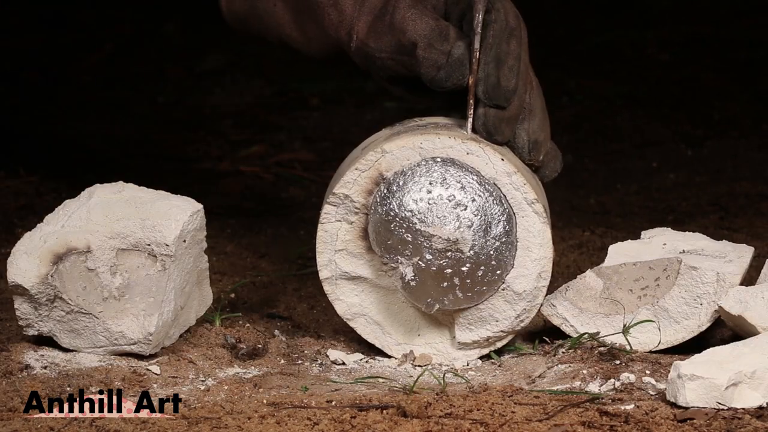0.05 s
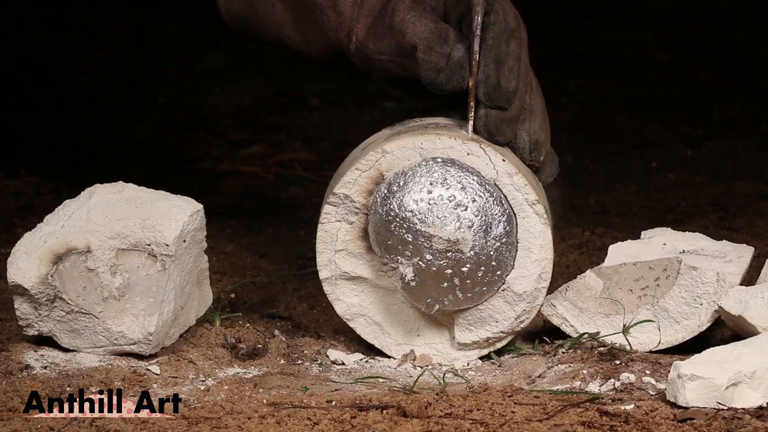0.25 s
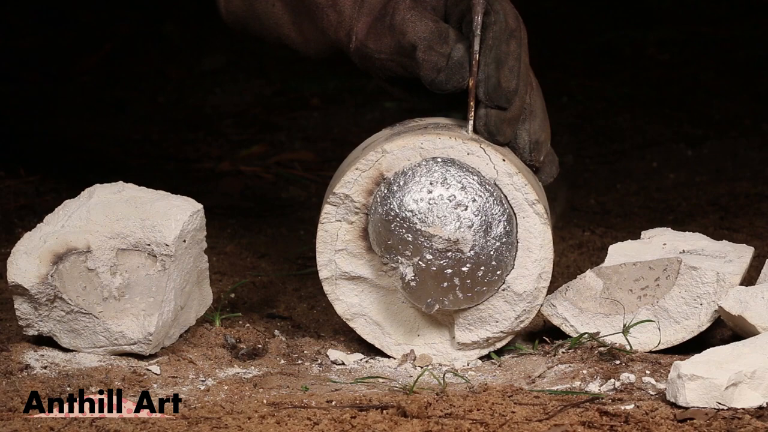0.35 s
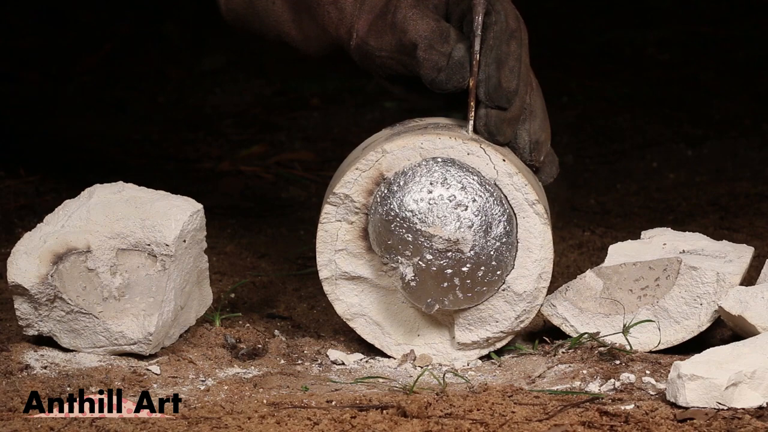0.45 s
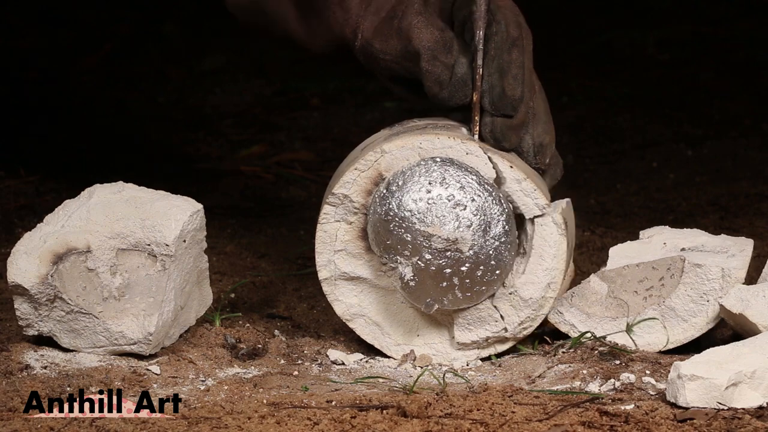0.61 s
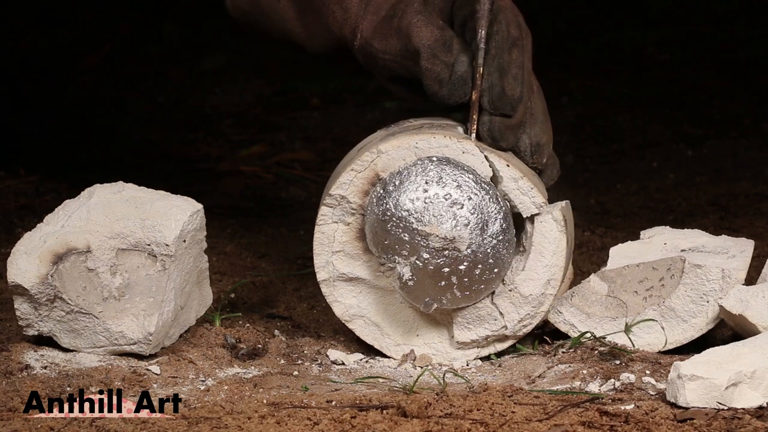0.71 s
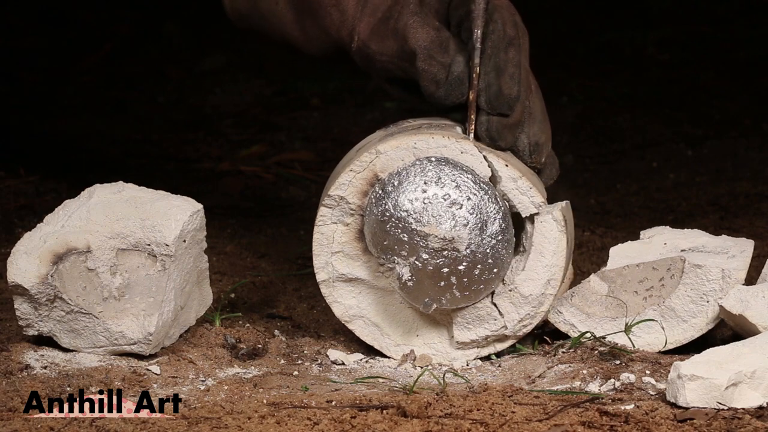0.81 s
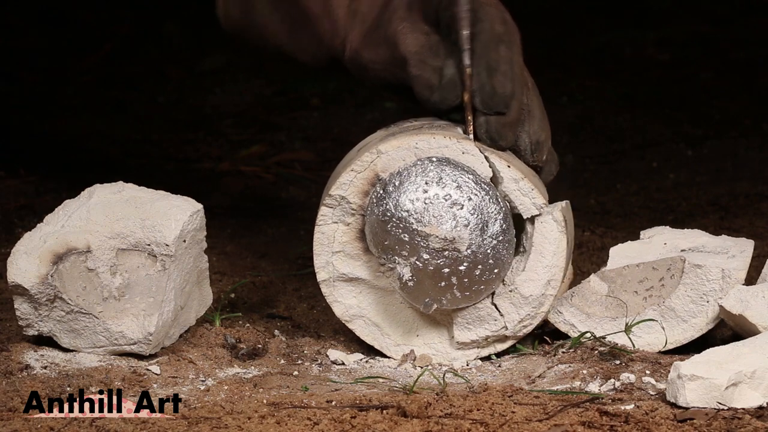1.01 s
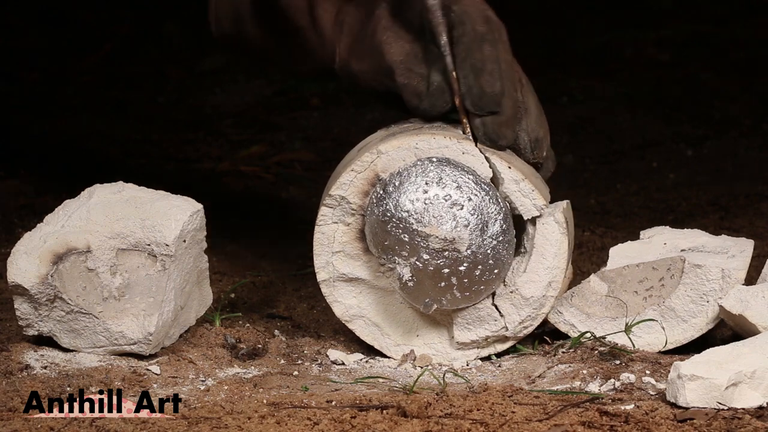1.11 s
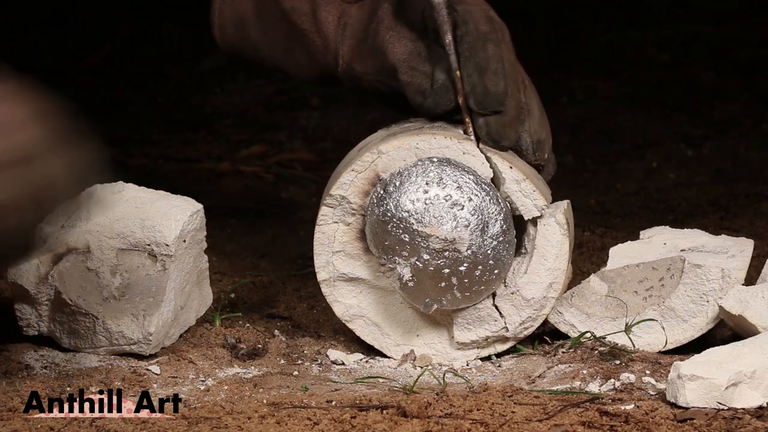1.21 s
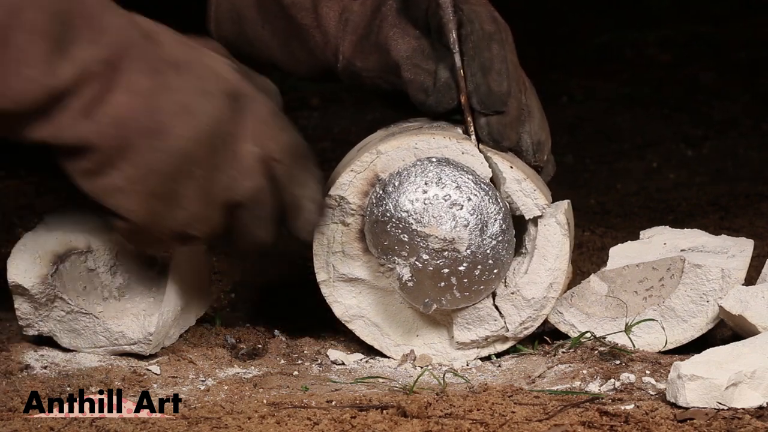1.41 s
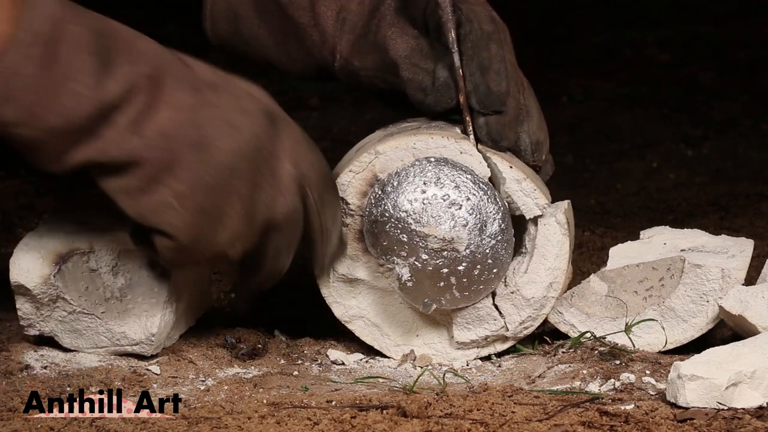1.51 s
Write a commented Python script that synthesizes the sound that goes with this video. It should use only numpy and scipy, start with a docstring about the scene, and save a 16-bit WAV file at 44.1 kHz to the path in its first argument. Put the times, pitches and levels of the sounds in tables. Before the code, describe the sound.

A steel chisel is struck into a plaster mould at about 0.2 and 0.65 seconds. Each close, sharp crack overloads the microphone, with a brief ring and a low thump; the second is slightly brighter. Insects chirr throughout over outdoor night air and a faint machine hum, one buzzing up around the first blow. From about 1.2 seconds come two faint bumps and a soft sleeve rustle.

```python
"""A steel chisel is struck twice into a plaster mould, close enough to overload the microphone.
Each blow is a steel tick, a plaster crack and a short ring of mould and tool, then a rebound click
and a low thump on the ground; nearby surfaces throw back slaps and a short tail.
Behind it lies an outdoor night bed: air, a distant machine hum and chirring insects, one of which
buzzes up briefly. Near the end the worker shifts with two soft bumps and a rustle of sleeve."""
import sys
import numpy as np
from scipy import signal
from scipy.fft import rfft, irfft, next_fast_len
from scipy.io import wavfile

SR = 44100
rng = np.random.default_rng(int(sys.argv[2]) if len(sys.argv) > 2 else 0)


def to_wav(s):
    """Save 16-bit WAV."""
    ch = np.atleast_2d(s).T  # columns
    pcm = np.round(np.clip(ch, -1, 1) * 32767)  # PCM
    wavfile.write(sys.argv[1], SR, pcm.astype(np.int16))


N = 68355
TIME = np.arange(N) / SR

# colour of the microphone hiss: (frequency [Hz], relative density [dB])
HISS_COLOUR = [(100, 2.5), (3000, -15.5), (6000, -26.5), (9000, -8), (16000, -7.5)]
# colour of the night air: (frequency [Hz], relative density [dB])
AIR_COLOUR = [(25, -25), (50, 4), (75, 2), (110, 0.5), (200, -2), (400, -12.5), (900, -13), (1700, -20.5),
              (2900, -16.5), (4500, -19.5), (7500, -21), (9500, -32.5), (16000, -35)]
HISS_DB, AIR_DB = -48.5, -37.5
# partials of the machine hum: (frequency [Hz], level [dB])
HUM_PARTIALS = [(59.5, -41.5), (121, -47), (183, -43), (234, -59), (267, -54)]
# fader ride on the hum: (time [s], gain [dB])
HUM_RIDE = [(0, -0.5), (0.85, 0), (1.27, -2.5), (1.35, 0), (1.55, -8)]
HUM_WAVER_DB = 2

# steady insect voices: (pitch [Hz], bandwidth [Hz], level [dB], wing strokes [1/s])
CHORUS = [(2270, 170, -52, 79), (3750, 240, -44.5, 140), (5120, 130, -54.5, 64), (6134, 274, -33.5, 280),
          (6414, 210, -34, 76), (7144, 680, -41, 130)]
# a lower insect coming and going: (time [s], level [dB])
LOW_CHIRR_RIDE = [(0, -53), (0.16, -41.5), (0.24, -55), (0.47, -46), (0.55, -44.5), (0.84, -42.5),
                  (0.94, -47), (1.03, -45), (1.14, -40), (1.21, -49), (1.28, -39), (1.35, -47.5),
                  (1.55, -45.5)]
# a nearer insect buzzing up: (time [s], level [dB])
BUZZ_RIDE = [(0.17, -65), (0.195, -32), (0.3, -32.5), (0.39, -35), (0.5, -41), (0.6, -46), (0.8, -47),
             (0.95, -74)]
SWELL_DB, SWELLS_PER_S = 0.2, 3.2

# soft bumps as the worker shifts: (time [s], level [dB], half-width [s])
SOFT_BUMPS = [(1.218, -42, .016), (1.413, -43, 0.01)]
# a sleeve rustling closer: (time [s], level [dB])
SLEEVE_RIDE = [(1.15, -87), (1.4, -46), (1.49, -50.5), (1.55, -37)]
# colour of the sleeve: (frequency [Hz], relative density [dB])
CLOTH_COLOUR = [(150, -4), (700, 0), (2800, 0), (8000, -20), (16000, -22)]

# scattered sound: (frequency [Hz], relative density [dB], t60 [s])
TAIL_BANDS = [(153, 0, 0.41), (348, 2, 0.21), (910, -0.5, 0.32), (2000, -7, 0.41), (4400, -5.5, 0.27),
              (6880, -17, 0.51), (9600, -21.5, 0.37), (13000, -35, .24), (16000, -35, .2)]
TAIL_DB, TAIL_DELAY_S, TAIL_BUILD_S = -18, 0.0037, 0.0041
EARLY_DB, EARLY_T60_S = -13, 0.11
TAIL_GRIT_DB, TAIL_GRAINS_PER_S = 0.5, 350
# slaps off nearby surfaces: (delay [s], gain [dB], low-pass cutoff [Hz])
SLAPS = [(.0146, -15, 14000), (.0235, -23, 900), (.028, -25, 1800)]

# low ring of the mould on the ground: (frequency [Hz], relative level [dB], t60 [s], build-up [s])
THUMP_MODES = [(69.9, 7.5, 0.31, 0.095), (138.3, -1, .15, 0.0091), (197.7, -18.5, 0.18, 0.0034),
               (236.9, -11, 0.097, 0.0033), (320, -5, 0.089, 0.0012), (424, -7, 0.082, 0.003)]
# ring of mould and chisel: (frequency [Hz], relative level [dB], t60 [s])
RING_MODES = [(590, -11, 0.074), (688, -6.5, 0.028), (785, 8.5, 0.016), (910, 14.5, 0.015),
              (973.5, 13.5, 0.013), (1117.4, 6, 0.012), (1378, 5.5, 0.017), (1617, 4, 0.021),
              (2008, 3, 0.023), (2500, -2, 0.029), (3378, -3.5, 0.025), (3872, -3.5, 0.02),
              (4103, -12.5, 0.029), (4910, -4, 0.0091), (5174, -2.5, 0.023), (7620, -13.5, 0.015)]
# colour of the plaster crack: (frequency [Hz], relative density [dB])
CRACK_COLOUR = [(200, -42), (1000, 3.5), (1800, -4), (2900, -10), (4500, -3), (7000, -24), (11000, -27),
                (16000, -47)]
# chisel blows: (time [s], hit gain [dB], thump gain [dB], ring tilt [dB/octave])
CHISEL_BLOWS = [(0.2207, 0.502, 4, 0), (0.6492, 2.5, -1.5, 1.34)]
CONTACT_S, TILT_PIVOT_HZ = 0.00013, 973.5
CRACK_DB, CRACK_T60_S = 5.5, 0.02
TICK_DB, TICK_T60_S, TICK_BAND_HZ = -14, 0.0024, (3240, 10800)
REBOUND_DELAY_S, REBOUND_DB, REBOUND_T60_S = 0.012, -3.5, 0.0031
CLIP_LEVEL, CUTOFF_HZ = 0.98, 17000


def from_db(db):
    """Decibels to gain."""
    return 10 ** (np.asarray(db) / 20)


def rms_one(x):
    """Scale to unit rms."""
    return x / np.sqrt(np.mean(x ** 2) + 1e-20)


def at_hz(points, hz, column=1):
    """Read a column of a table on a log-frequency axis."""
    table = np.array(points)
    return np.interp(np.log(hz + 1e-3), np.log(table[:, 0]), table[:, column])


def fader(ride):
    """Gain over time from (time [s], level [dB]) points."""
    return from_db(np.interp(TIME, *np.transpose(ride)))


def coloured(colour):
    """Unit-rms noise with the given spectrum."""
    size = next_fast_len(N)
    hz = np.arange(size // 2 + 1) * SR / size
    spectrum = rfft(rng.standard_normal(size)) * from_db(at_hz(colour, hz))
    return rms_one(irfft(spectrum, size)[:N])


def band(low_hz, high_hz, order=2):
    """Unit-rms band of noise, pre-rolled so the filter has settled."""
    sos = signal.butter(order, [low_hz, high_hz], "band", fs=SR, output="sos")
    return rms_one(signal.sosfilt(sos, rng.standard_normal(2 * N))[N:])


def drift(per_s):
    """Random modulator with a spread of about 1."""
    return np.interp(TIME * per_s, np.arange(1024), rng.standard_normal(1024))


def decay(start, build_s, t60, order=1):
    """Attack and decay envelope; a higher order softens the attack."""
    age = np.maximum(TIME - start, 0)
    return (1 - np.exp(-age / build_s)) ** order * np.exp(-np.log(1000) * age / t60)


def ring(start, hz, build_s, t60, order=1):
    """One struck mode: a dying sine."""
    return np.sin(2 * np.pi * hz * (TIME - start)) * decay(start, build_s, t60, order)


def microphone_hiss():
    """A faint noise floor, separate in each channel."""
    return from_db(HISS_DB) * np.array([coloured(HISS_COLOUR), coloured(HISS_COLOUR)])


def night_air():
    """A steady, bass-heavy bed of outdoor air."""
    return from_db(AIR_DB) * coloured(AIR_COLOUR)


def machine_hum():
    """A distant machine: low partials, each wavering in level and phase."""
    hum = np.zeros(N)
    for hz, db in HUM_PARTIALS:
        amplitude = np.sqrt(2) * from_db(db + HUM_WAVER_DB * drift(per_s=12))
        phase = 2 * np.pi * (hz * TIME + rng.random()) + 0.13 * drift(per_s=6.3)
        hum += amplitude * np.sin(phase)
    return fader(HUM_RIDE) * hum


def chirr(hz, width_hz, strokes_per_s, depth_db=0.5, unsteady=0.16):
    """A wing resonance rasped in quick, slightly uneven strokes."""
    stroke_rate = strokes_per_s * (1 + unsteady * drift(strokes_per_s))
    strokes = np.sin(2 * np.pi * np.cumsum(stroke_rate) / SR)
    wing = band(hz - width_hz / 2, hz + width_hz / 2)
    return rms_one(wing * from_db(depth_db * strokes + SWELL_DB * drift(SWELLS_PER_S)))


def insects():
    """Rasping wings: a steady chorus, a lower voice that comes and goes, and one short buzz."""
    chorus = sum(from_db(db) * chirr(hz, width, rate) for hz, width, db, rate in CHORUS)
    low = fader(LOW_CHIRR_RIDE) * chirr(hz=3387, width_hz=226, strokes_per_s=66)
    buzz = fader(BUZZ_RIDE) * chirr(hz=5057, width_hz=150, strokes_per_s=48, depth_db=3)
    return chorus + low + buzz


def worker():
    """Body movement: soft swells of rumble and a rustling sleeve."""
    swells = sum(from_db(db) * np.exp(-0.5 * ((TIME - at) / width) ** 2) for at, db, width in SOFT_BUMPS)
    bumps = swells * band(low_hz=48, high_hz=94.5)
    return bumps + fader(SLEEVE_RIDE) * coloured(CLOTH_COLOUR)


def scatter(start):
    """Diffuse reflections: a quick dense cluster and a tail, dying in half-octave bands."""
    centres = 150 * 2 ** (np.arange(14) / 2)
    half_band = 2 ** (1 / 4)
    gains = from_db(at_hz(TAIL_BANDS, centres)) * np.sqrt(centres)  # wider bands carry more power
    early = from_db(EARLY_DB) * decay(start, TAIL_BUILD_S, EARLY_T60_S)
    wash = np.zeros(N)
    for hz, gain in zip(centres, gains / np.linalg.norm(gains)):
        tail = from_db(TAIL_DB) * decay(start, TAIL_BUILD_S, at_hz(TAIL_BANDS, hz, column=2))
        wash += gain * band(hz / half_band, hz * half_band, order=3) * (early + tail)
    return wash


def slapback(direct):
    """Nearby surfaces each return one delayed, dulled copy."""
    slaps = np.zeros(N)
    for delay, db, cutoff_hz in SLAPS:
        delayed = np.interp(TIME - delay, TIME, direct, left=0)
        slaps += from_db(db) * signal.lfilter(*signal.butter(1, cutoff_hz, fs=SR), delayed)
    return slaps


def thump(start):
    """The mould booms on the ground, swelling in under the hit."""
    return sum(from_db(db) * ring(start, hz, build_s, t60, order=2)
               for hz, db, t60, build_s in THUMP_MODES)


def rebound(start):
    """The tool bounces and lands a bright second click."""
    envelope = decay(start + REBOUND_DELAY_S, CONTACT_S, REBOUND_T60_S)
    return from_db(REBOUND_DB) * band(*TICK_BAND_HZ) * envelope


def chisel_hit(start, tilt_db_per_octave):
    """Steel ticks on steel, the plaster cracks, and mould and chisel ring briefly."""
    tick = from_db(TICK_DB) * band(*TICK_BAND_HZ) * decay(start, CONTACT_S, TICK_T60_S)
    crack = from_db(CRACK_DB) * coloured(CRACK_COLOUR) * decay(start, CONTACT_S, CRACK_T60_S)
    body = np.zeros(N)
    for k, (hz, db, t60) in enumerate(RING_MODES):
        gain = from_db(db + tilt_db_per_octave * np.log2(hz / TILT_PIVOT_HZ))
        body += (-1) ** k * gain * ring(start, hz, CONTACT_S, t60)  # modes alternate in polarity
    return tick + crack + body


def scene():
    """Mix the blows over the night bed, all dead centre; only the hiss is stereo."""
    hits = sum(from_db(db) * chisel_hit(start, tilt) for start, db, _, tilt in CHISEL_BLOWS)
    blows = hits + slapback(hits)
    grit = from_db(TAIL_GRIT_DB * drift(TAIL_GRAINS_PER_S))
    for start, hit_db, thump_db, _ in CHISEL_BLOWS:
        blows += from_db(hit_db) * (rebound(start) + grit * scatter(start + TAIL_DELAY_S))
        blows += from_db(thump_db) * thump(start)
    return blows + insects() + machine_hum() + night_air() + worker() + microphone_hiss()


def record(dry):
    """The overloaded microphone clips the blows flat; a steep low-pass trims the top."""
    low_pass = signal.cheby2(12, 70, CUTOFF_HZ, fs=SR, output="sos")
    return signal.sosfilt(low_pass, np.clip(dry, -CLIP_LEVEL, CLIP_LEVEL))


dry = scene()
out = record(dry)
to_wav(out)
```